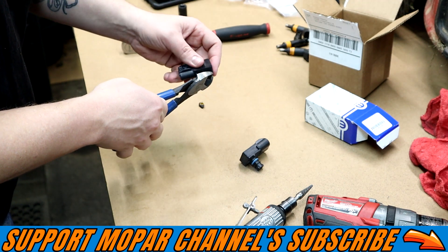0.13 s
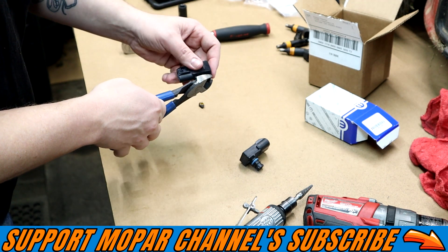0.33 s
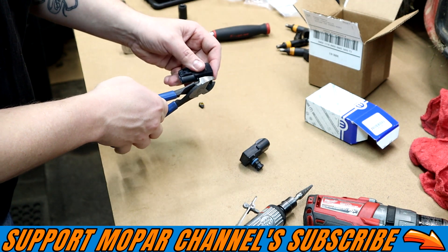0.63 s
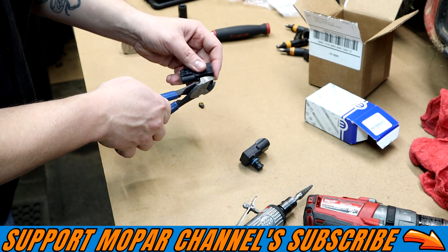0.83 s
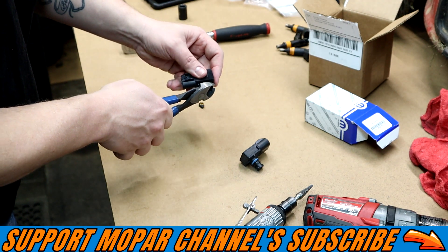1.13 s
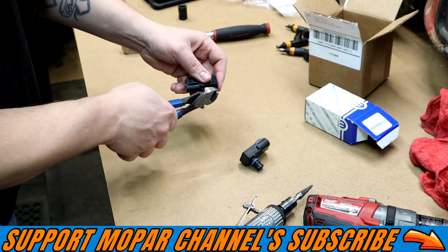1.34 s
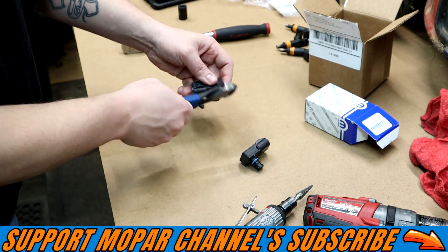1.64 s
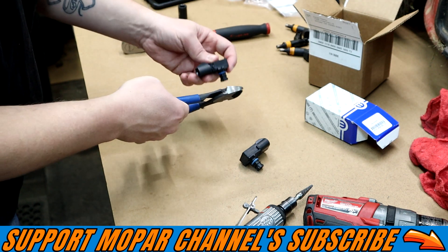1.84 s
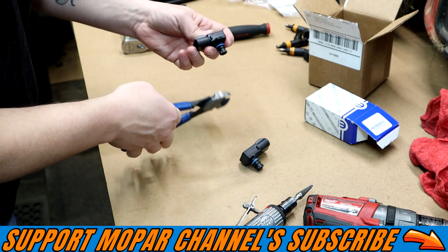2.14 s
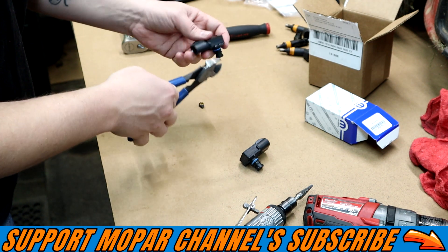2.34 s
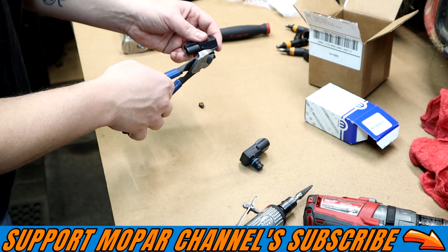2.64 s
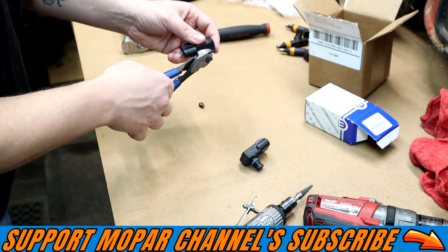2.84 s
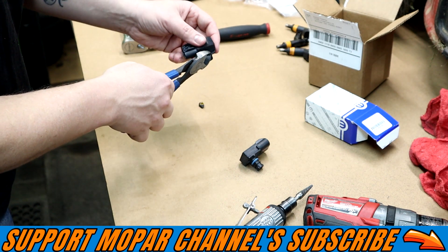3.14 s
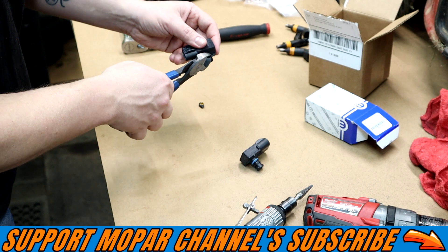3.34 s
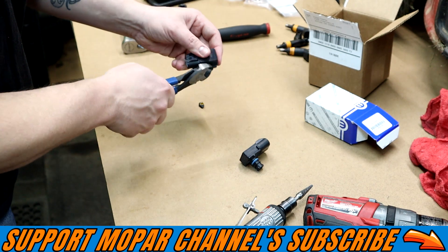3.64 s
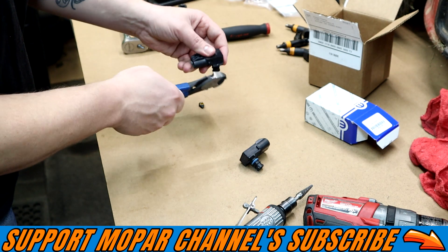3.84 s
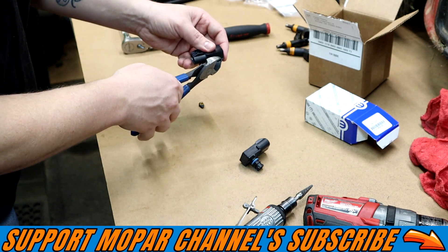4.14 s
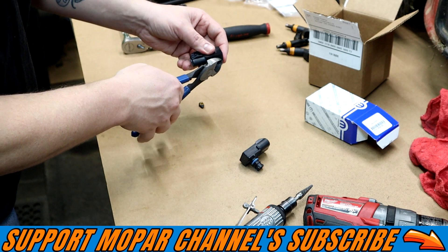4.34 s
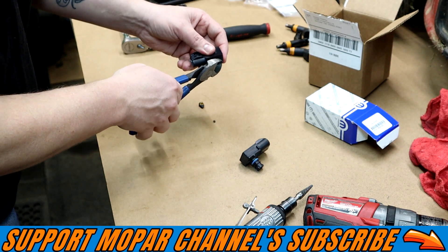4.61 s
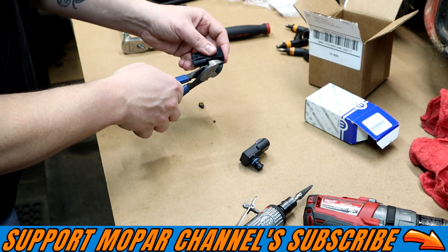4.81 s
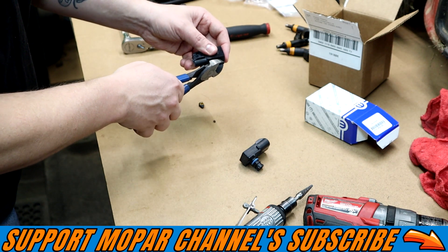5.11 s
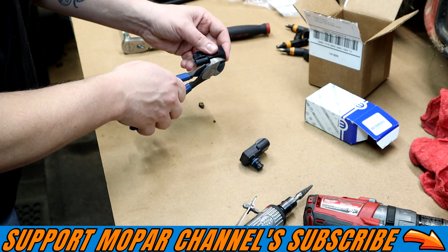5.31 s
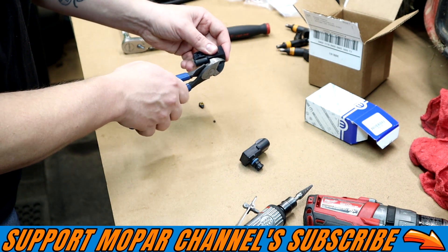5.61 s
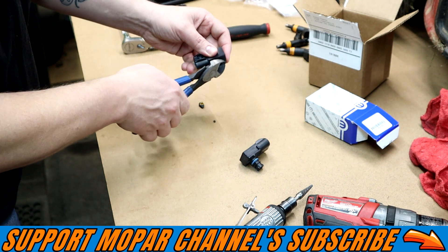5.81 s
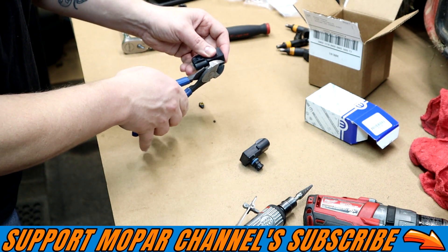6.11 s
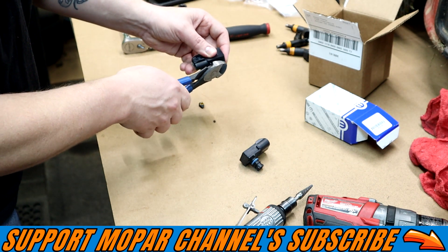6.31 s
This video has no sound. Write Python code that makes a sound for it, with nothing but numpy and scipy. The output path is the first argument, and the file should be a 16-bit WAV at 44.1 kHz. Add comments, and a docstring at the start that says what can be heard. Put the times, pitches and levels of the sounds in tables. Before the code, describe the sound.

Close by at a garage workbench, side cutters tick faintly against a small plastic part, then bite through with a loud, sharp crack and a bright steel ring. A chip lands far off with a thin tick. The jaws tap the plastic and cut again with a quieter cluster of cracks, followed by light taps and a chip ticking on the bench. Faint hum and soft air lie underneath.

```python
"""Side cutters bite through a plastic tab twice, close by, over a workbench in a garage.
The plastic ticks under the jaws, then breaks in a few quick cracks, and the steel rings as the jaws meet.
The jaws tap the part as they find a new grip. One chip lands across the room, another on the bench.
The garage echoes the cracks, taps and chips. Behind them are mains hum, a thin electrical buzz,
a soft rush of air and a far machine that slowly swells."""
import sys
import numpy as np
from scipy import signal
from scipy.fft import rfft, irfft, next_fast_len
from scipy.io import wavfile
from scipy.ndimage import map_coordinates

SR = 44100
rng = np.random.default_rng(int(sys.argv[2]) if len(sys.argv) > 2 else 0)


def pcm_store(signal):
    """Save signal as 16-bit PCM."""
    levels = np.round(np.clip(np.atleast_2d(signal), -1, 1) * 32767)
    wavfile.write(sys.argv[1], SR, levels.astype(np.int16).T)


N = 284886
AGE = np.arange(SR) / SR  # seconds since a blow, up to one second
HZ = np.fft.rfftfreq(SR, 1 / SR)  # the frequencies in a one-second sound

# The jaws slam shut. Each row: time in seconds, ring level in dB, extra bass for cracks just then in dB.
SLAMS = [(1.584, 2, 8), (3.7632, -15.5, 15)]


def cracks_and_ticks(crackle_db=4, crackle_t60=0.008, push_db=-6, slam_window_s=0.002, room_db=-11.5):
    """Sharp cracks and ticks of plastic; just after the second cut, the chip ticks on the bench.
    Each is a click and a short crackle, with a very brief note from the plastic."""
    # Each row: start in seconds, level in dB, treble tilt in dB per octave,
    # the plastic's note in Hz, that note's boost in dB.
    plastic_sounds = [(1.0562, -21.5, 0, 4435, 22), (1.0624, -20.5, 4.5, 4485, 23),
                      (1.5823, 16, 0, 6440, 3), (1.5851, 9, 2, 3240, 4.5), (3.722, -26, -3, 3700, 14),
                      (3.7521, 3.5, -1, 3150, 3.5), (3.757, -4.5, 1.5, 3760, 9), (3.759, 2.5, -8, 4990, 15),
                      (3.7591, 1.5, -5.5, 1956, 26), (3.7608, 3, -0.5, 11540, 17.5),
                      (3.8025, -19.5, -9, 1980, 17), (4.593, -15.5, -2, 4000, 11),
                      (4.6377, -30, 4, 7970, 0)]
    # The tone of a crack or tick. Each row: frequency in Hz, relative level in dB.
    crack_colour = [(40, -17), (110, -19), (270, -6.5), (400, -9.5), (550, -12.5), (850, -8.5), (1550, -18),
                    (2000, -2.5), (4400, -4), (5500, -2.5), (7200, -6), (9000, -6.5), (13000, -8),
                    (16000, -14.5)]
    track = np.zeros(N)
    colour = along(crack_colour, HZ) + plastic_part_db()
    octaves = np.log2(np.maximum(HZ, 1500) / 4000)
    bass_band = 1 / (1 + ((HZ - 260) / 300) ** 2)
    for start, db, tilt_db, hz, boost_db in plastic_sounds:
        # cracks that part the tab, just as the jaws close, push the most air
        parting_db = sum(extra_db * np.exp(-((start - shut) / slam_window_s) ** 2)
                         for shut, _, extra_db in SLAMS)
        shape = colour + tilt_db * octaves + (push_db + parting_db) * bass_band
        width = hz / 7
        overtone = bump(3.25 * hz, 2 * width, 0.45 * boost_db)
        note = bump(hz, width, boost_db) + overtone
        attack = click(shape + note)
        crackle = unit_energy(rng.standard_normal(SR) * fade(crackle_t60))
        direct = unit_energy(attack + amp(crackle_db) * through(crackle, attack))
        # the room gathers sound from all directions, so the note stands out less there
        room = through(click(shape + 0.5 * note), garage_echo())
        add(track, start, amp(db) * (direct + amp(room_db) * room))
    return track


def plastic_part_db():
    """The plastic part boosts the pitches at which it likes to ring; this gives that boost in dB."""
    # Each row: pitch in Hz, width in Hz, boost in dB.
    resonances = [(2180, 296, 7), (2961, 160, 3), (3560, 160, 5.5), (5600, 220, 2), (6600, 400, 5.5),
                  (7900, 160, 4.5)]
    return sum(bump(hz, width, db) for hz, width, db in resonances)


def steel_ring():
    """The shock of the jaws meeting rings a few clear tones among clusters of close, beating ones."""
    # Each row: centre in Hz, width in Hz, level in dB relative to the slam, fade time in seconds.
    clusters = [(969, 500, -16.5, 0.63), (3330, 440, -10, 1.2), (3900, 3400, -13, 1.7),
                (6750, 600, -8.5, .8), (11300, 1200, -11.5, .5)]
    # Each row: pitch in Hz, level in dB relative to the slam, fade time in seconds.
    clear_tones = [(3247, -15, 0.4), (3346, -13, 0.46), (3417, -18, 1.1), (3760, -18, .6),
                   (6623, -15, 0.49), (6688, -15, 0.38), (6798, -15, 0.44), (6985, -14, .42),
                   (7072, -16.5, .4), (10900, -23, .45), (11330, -23.5, .4)]
    track = np.zeros(N)
    for start, slam_db, _ in SLAMS:
        for hz, width, db, t60 in clusters:
            cluster = filtered(rng.standard_normal(SR), lambda f: 1 / (1 + ((f - hz) / width) ** 2) ** 2)
            add(track, start, amp(slam_db + db) * unit_energy(cluster * fade(t60)))
        for hz, db, t60 in clear_tones:
            tone = np.sin(2 * np.pi * (hz * AGE + rng.random())) * fade(t60)
            add(track, start, amp(slam_db + db + rng.normal()) * unit_energy(tone))
    return track


def jaw_taps(ping_hz=3355, ping_db=-11.5, bench_delay_s=0.00218, bench_db=-8, room_db=-10):
    """Steel knocks dully on plastic, and each knock bounces back off the bench top."""
    # Each row: start in seconds, level in dB, note of the touched spot in Hz.
    taps = [(0.228, -29.5, 2800), (2.8985, -26, 2600), (4.2133, -23.5, 2080), (4.4186, -28, 1960),
            (4.4262, -29.5, 1950), (5.4236, -35, 2080)]
    # The tone of a tap. Each row: frequency in Hz, relative level in dB.
    tap_colour = [(100, -23), (500, 2.5), (900, 9), (1400, 3.5), (1900, 4.5), (2900, -0.5), (3400, 5.5),
                  (3900, -16), (5000, -3), (9000, -46)]
    track = np.zeros(N)
    colour = along(tap_colour, HZ) + 0.31 * plastic_part_db()
    # a tap wakes a note in the steel, which the plastic quickly damps
    ping = amp(ping_db) * unit_energy(np.sin(2 * np.pi * ping_hz * AGE) * fade(t60=0.032))
    for start, db, hz in taps:
        knock = amp(db) * (click(colour + bump(hz, width=920, db=9)) + ping)
        add(track, start, knock + amp(room_db) * through(knock, garage_echo()))
        add(track, start + bench_delay_s, amp(bench_db) * knock)
    return track


def chip_landing(direct_db=-14):
    """The first cut-off chip lands across the garage: a thin tick that is nearly all echo."""
    # Each row: start in seconds, level in dB.
    landings = [(2.168, -26)]
    # The tone of the tick. Each row: frequency in Hz, relative level in dB.
    chip_colour = [(2000, -30), (6000, -12.5), (9000, -9), (15000, -3)]
    track = np.zeros(N)
    tick = click(along(chip_colour, HZ))
    for start, db in landings:
        add(track, start, amp(db) * (amp(direct_db) * tick + through(tick, garage_echo())))
    return track


def garage_echo(early_db=-4, early_t60=0.1203, onset_s=0.0014):
    """A fresh echo: quick bounces off bench and boxes, then a tail whose middle pitches last longest."""
    # Each row: frequency in Hz, fade time in seconds.
    fade_times = [(100, 0.29), (700, 0.45), (2000, 0.44), (5000, 0.43), (9000, 0.3), (15000, .33)]
    # The tone of the echo. Each row: frequency in Hz, relative level in dB.
    echo_colour = [(60, -2.5), (250, 5.5), (800, -2.5), (1350, 8), (2100, -3.5), (3200, 2), (5000, 0.5),
                   (9000, 3), (15000, -2.5)]
    hz, t, noise_bands = signal.stft(rng.standard_normal(SR), SR, nperseg=256)
    band_fades = np.exp(-np.log(1000) * t / along(fade_times, hz)[:, None])
    tail = signal.istft(noise_bands * band_fades, SR, nperseg=256)[1][:SR]
    early = rng.standard_normal(SR) * fade(early_t60)
    echo = (unit_energy(tail) + amp(early_db) * unit_energy(early)) * (1 - np.exp(-AGE / onset_s))
    return through(unit_energy(echo), click(along(echo_colour, HZ)))


def hum_and_buzz(mains_hz=59.98, buzz_db=-63.5, uneven_db=6.0):
    """Mains power makes a low hum and a fine buzz that repeats every third mains cycle."""
    # Each row: multiple of the mains frequency, level in dB.
    hum_tones = [(1, -63), (2, -72.5), (4, -66), (6, -74.5), (12, -67), (13, -77.5), (14, -70), (16, -82.5),
                 (18, -76.5), (20, -75.5), (24, -75.5), (26, -86.5)]
    # The tone of the buzz. Each row: frequency in Hz, relative level in dB.
    buzz_colour = [(400, -3.5), (1450, 2), (1800, -2), (2200, 1.5), (2900, -6), (3600, -3), (4300, -6),
                   (5100, 1.5), (5600, -8), (5900, 6), (6300, 4.5), (7300, -8), (8000, -2.5), (8700, -8.5),
                   (16000, -18)]
    t = np.arange(N) / SR
    hum = sum(sine(k * mains_hz * t + rng.random(), db) for k, db in hum_tones)
    period = round(3 * SR / mains_hz)
    hz = np.fft.rfftfreq(period, 1 / SR)
    # the buzz's tones differ in strength, capped so that none stands out as a whistle
    scatter = np.minimum(rng.standard_normal(len(hz)), 1.4)
    strengths = amp(along(buzz_colour, hz) + uneven_db * scatter) * (hz > 2 * mains_hz)
    phases = np.exp(2j * np.pi * rng.random(len(hz)))
    buzz = np.resize(irfft(strengths * phases, period), N)
    return hum + amp(buzz_db) * unit(buzz)


def room_air(level_db=-64.5):
    """The air in the room makes a soft, low rush."""
    # Each row: frequency in Hz, relative level in dB.
    air_colour = [(20, -8.5), (40, 5), (150, 0.5), (400, -5.5), (650, -7), (850, -1.5), (1200, -11.5),
                  (2000, -14), (4000, -23), (8000, -21.5), (16000, -23)]
    rush = filtered(rng.standard_normal(N), lambda f: amp(along(air_colour, f)))
    return amp(level_db) * unit(rush)


def far_machine(pitch_hz=272, climb_hz_per_s=2.1, full_at_s=3.6, swell_s=1.6, idle_db=-85, full_db=-76):
    """A far machine, perhaps a fan, swells and then holds; its tone creeps upward and wavers."""
    # Each row: multiple of the machine's pitch, relative level in dB.
    harmonics = [(1, -0.5), (2, -1), (3, -.5)]
    since_full = np.arange(N) / SR - full_at_s
    swell = np.clip(1 + since_full / swell_s, 0, 1)
    level_db = idle_db + (full_db - idle_db) * swell + 1.5 * wobble(7)
    hz = (pitch_hz + climb_hz_per_s * since_full) * (1 + 0.0045 * wobble(6.6))
    cycles = np.cumsum(hz) / SR
    return amp(level_db) * sum(sine(k * cycles, db) for k, db in harmonics)


def amp(db):
    """Turn decibels into a gain."""
    return 10 ** (np.asarray(db) / 20)


def unit(x):
    """Scale x to an average (rms) level of 1."""
    return x / np.sqrt(np.mean(x ** 2))


def unit_energy(x):
    """Scale x to a total energy of 1."""
    return x / np.linalg.norm(x)


def sine(cycles, db):
    """A pure tone with an average (rms) level of db."""
    return np.sqrt(2) * amp(db) * np.sin(2 * np.pi * cycles)


def along(points, hz):
    """Read between (Hz, value) points, with octaves evenly spaced."""
    freqs, values = np.transpose(points)
    return np.interp(np.log(hz + 1), np.log(freqs), values)


def bump(hz, width, db):
    """A boost in dB around one pitch; width is in Hz."""
    return db / (1 + (2 * (HZ - hz) / width) ** 2)


def filtered(x, gain):
    """Give each frequency in x its own gain."""
    size = next_fast_len(len(x) + SR // 2)
    return irfft(rfft(x, size) * gain(np.fft.rfftfreq(size, 1 / SR)), size)[:len(x)]


def click(colour_db):
    """The sharpest click of energy 1 that has this tone colour."""
    cepstrum = irfft(np.log(amp(colour_db)))
    # folding the second half onto the first packs the energy at the start
    cepstrum[1:SR // 2] *= 2
    cepstrum[SR // 2:] = 0
    return unit_energy(irfft(np.exp(rfft(cepstrum))))


def through(x, response):
    """Play x through something that answers a click with this response."""
    return signal.fftconvolve(x, response)[:len(x)]


def fade(t60):
    """Die away by 60 dB in t60 seconds, the fade time."""
    return np.exp(-np.log(1000) * AGE / t60)


def wobble(rate):
    """A smooth curve through rate random points a second."""
    return map_coordinates(rng.standard_normal(int(N * rate / SR) + 4), [np.arange(N) * rate / SR])


def add(track, start, sound):
    """Mix a sound into the track at start seconds."""
    part = track[round(start * SR):][:len(sound)]
    part += sound[:len(part)]


def scene():
    """All the sounds together in one channel."""
    cutting = cracks_and_ticks() + steel_ring() + jaw_taps() + chip_landing()
    background = hum_and_buzz() + room_air() + far_machine()
    return (cutting + background)[None]


def record(dry, top_hz=16000):
    """The loudest snap overloads the input, and the treble above top_hz is cut away."""
    clipped = np.clip(dry[0], -1, 1)
    return filtered(clipped, lambda hz: 1 / np.sqrt(1 + (hz / top_hz) ** 240))[None]


dry = scene()
out = record(dry)
pcm_store(out)
```